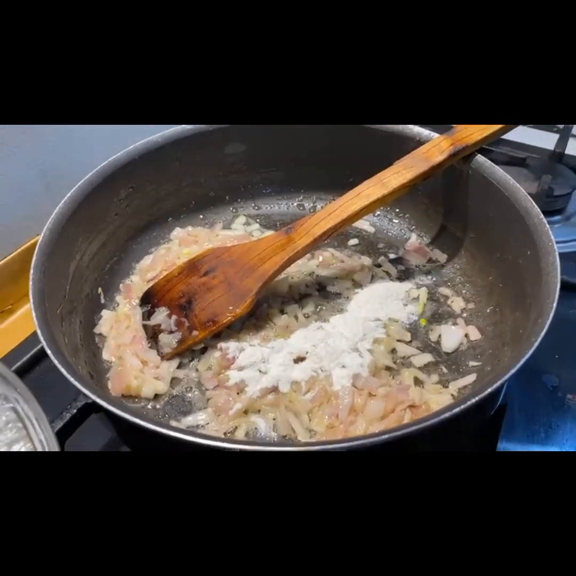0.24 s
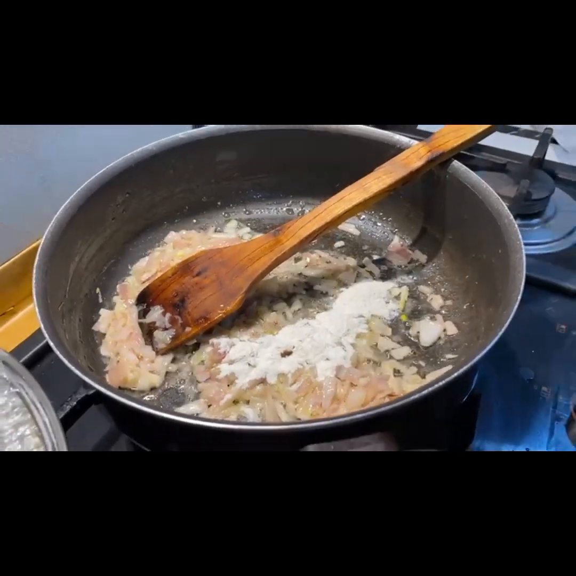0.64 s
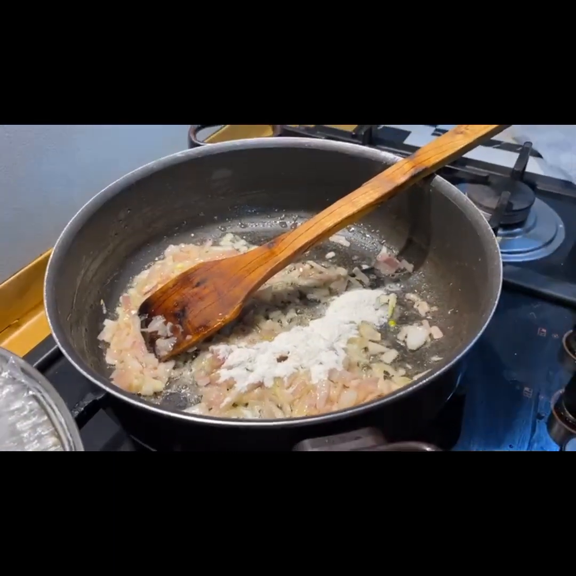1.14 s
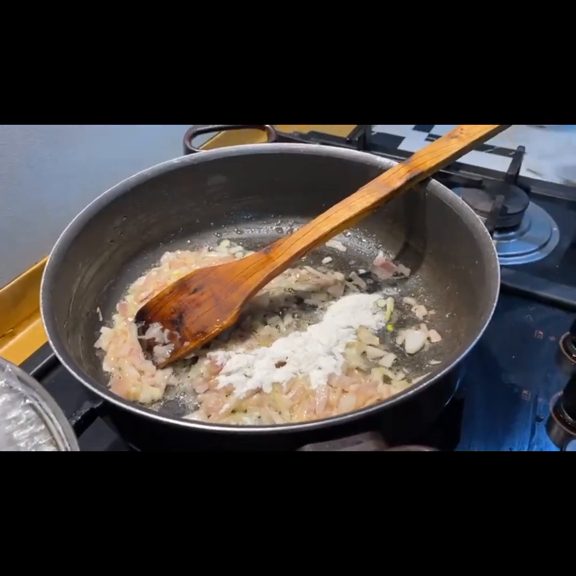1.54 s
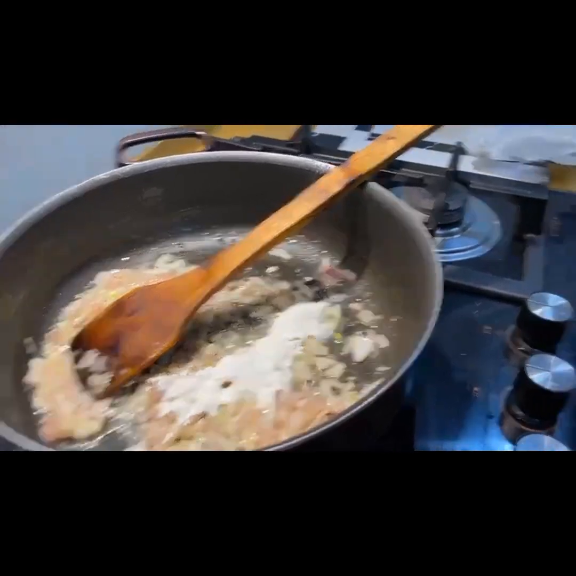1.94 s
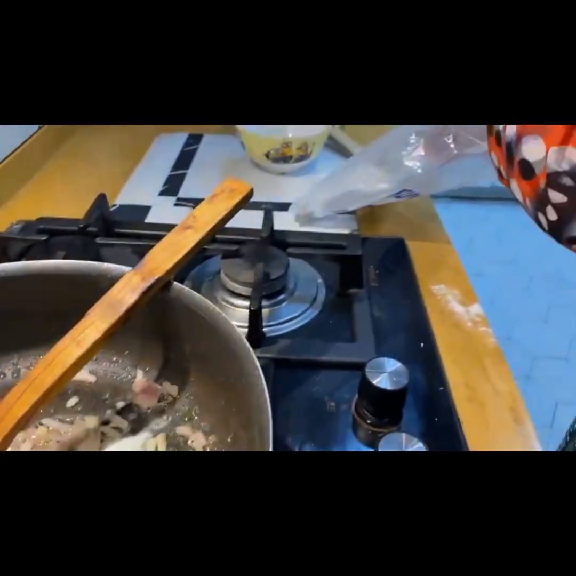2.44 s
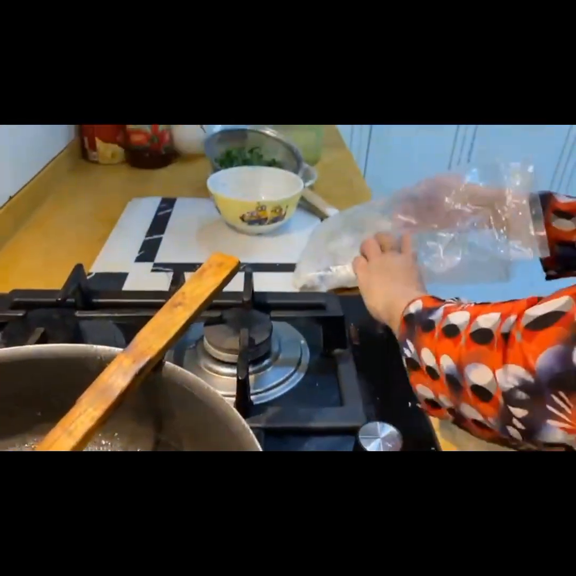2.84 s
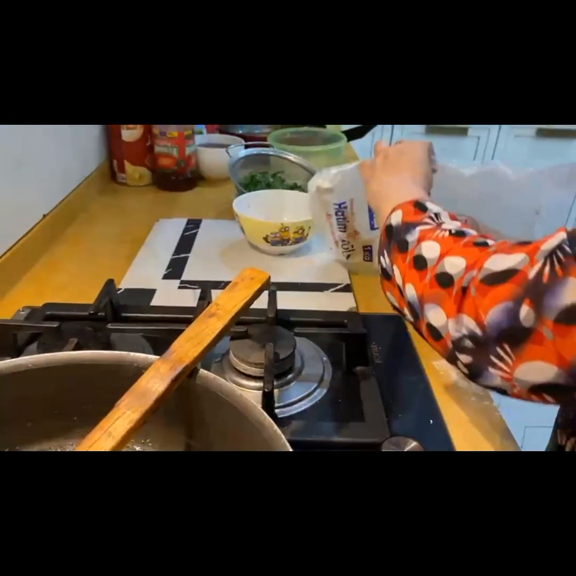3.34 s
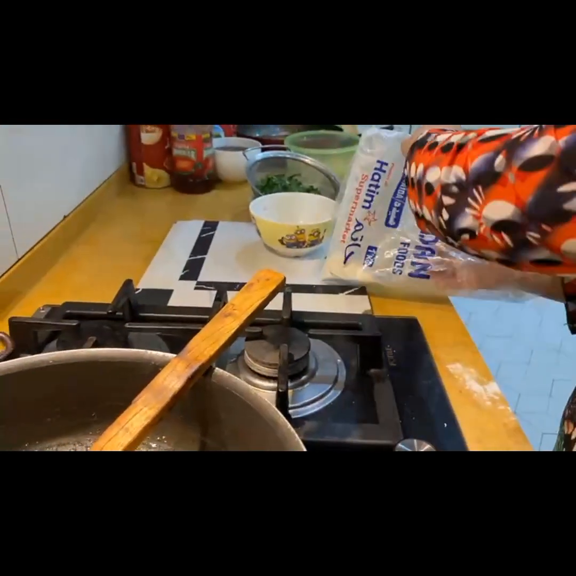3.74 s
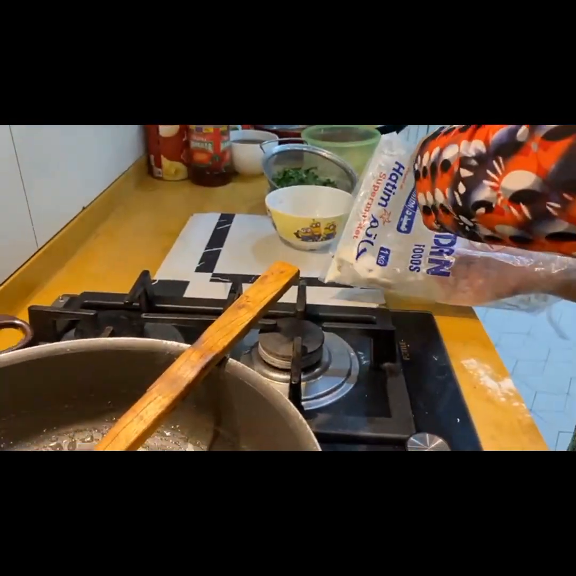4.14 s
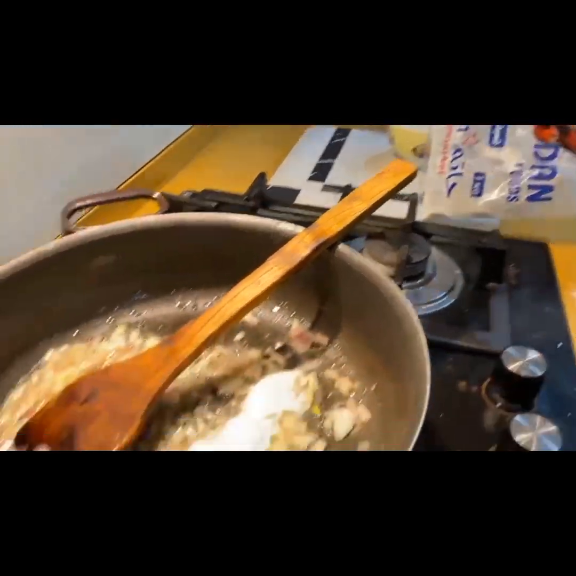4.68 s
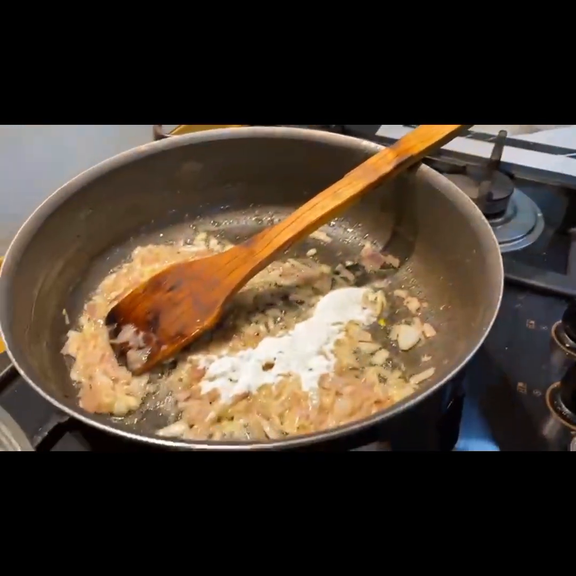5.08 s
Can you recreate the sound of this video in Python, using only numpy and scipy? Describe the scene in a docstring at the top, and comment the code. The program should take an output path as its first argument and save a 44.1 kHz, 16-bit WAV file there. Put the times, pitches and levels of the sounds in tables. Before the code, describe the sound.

A steady frying hiss and dense bubble crackle fill a small home kitchen over a faint fan rumble. Two soft low thumps come in the first half second, with a few small plastic ticks. After a calmer stretch, one very sharp spit pops, then a plastic bag crumples and snaps in clusters until the end, as more fat spits gather. Handheld stereo pickup near the pan, short room echo.

```python
"""Steam hisses and small bubbles burst as chopped onions fry in a pan; loud single spits stand out.
The sizzle is shaped noise plus random clicks; each spit is a ringing crack with a spray of droplets.
A plastic bag rustles on the worktop: random creases of film, and snaps that ring its modes.
A fan gives a low boom, faint tones and a soft wash of noise; two soft low thumps come early.
A hand-held pair of microphone ports picks it all up."""
import sys
import numpy as np
from scipy import signal
from scipy.fft import rfft, irfft
from scipy.io import wavfile
from scipy.ndimage import uniform_filter1d

SR = 44100
rng = np.random.default_rng(int(sys.argv[2]) if len(sys.argv) > 2 else 0)


def boost(x):
    """Linear amplitude factor 10**(x/20) for a level x in decibels (scalar or array-like)."""
    u = np.asarray(x, float) / 20
    return 10 ** u


def transcribe(u):
    """Save the signal u as a 16-bit wav file named by the first command-line argument.

    u: samples, shape (n,) or (channels, n), limited to [-1, 1]; the rate is SR.
    q: integer samples, one column per channel.
    """
    v = np.clip(np.atleast_2d(u).T, -1, 1)
    q = np.round(v * 32767).astype(np.int16)
    wavfile.write(sys.argv[1], SR, q)


N = 234303  # samples in the scene

# Resonant modes of the bag. Each row: frequency in Hz, relative level in dB, sharpness Q.
BAG_MODES = [(270, 0, 4), (540, 0, 6), (732, 0, 7), (957, 0, 8), (1410, 1, 12), (1817, 2, 17),
             (2320, 3, 22), (2850, 3, 24), (3370, 3, 26), (3800, 2, 14)]


def evened(x):
    """Normalization: scales a signal to an rms of 1."""
    return x / np.sqrt(np.mean(x ** 2) + 1e-20)


def read(points, hz):
    """Spectral interpolation: reads a (Hz, value) table on a log-frequency axis."""
    f, value = np.transpose(points)
    return np.interp(np.log(hz + 1), np.log(f + 1), value)


def follow(rows):
    """Amplitude envelope: turns (s, dB) rows into a gain for every sample."""
    s, db = np.transpose(rows)
    return boost(np.interp(np.arange(N) / SR, s, db))


def colour(x, points):
    """Linear filtering: multiplies the spectrum by a (Hz, dB) table."""
    return irfft(rfft(x) * boost(read(points, np.fft.rfftfreq(N, 1 / SR))), N)


def paired(x, y):
    """Channel coherence: left is x; right blends x with unrelated y by a likeness set per frequency."""
    # Left-right likeness as heard: diffuse lows, treble nearly all mid or, once turned, all side.
    # Each row: frequency in Hz, coherence from 0 to 1.
    likeness = [(60, .95), (150, .93), (300, .6), (500, .3), (950, .65), (1600, .2), (2800, .4),
                (3900, .86), (5200, .35), (6300, .96), (6900, .99), (7450, .995), (7950, .7), (8450, .999),
                (9700, .999), (10100, .6), (10700, .985), (11200, .999)]
    same = np.clip(read(likeness, np.fft.rfftfreq(N, 1 / SR)), 0, 1)
    right = same * rfft(x) + np.sqrt(1 - same ** 2) * rfft(y)
    return np.array([x, irfft(right, N)])


def patchy(points, patch_db, flicker_db):
    """Modulated noise: two noises with drifting spectral patches and a flicker shared by all bands."""
    frames, hz = N // 128 + 5, np.fft.rfftfreq(512, 1 / SR)
    a, b, c, d, patches = rng.standard_normal((frames, 257, 5)).T
    patches = uniform_filter1d(patches, size=8, axis=0)  # smooth over frequency
    patches = evened(uniform_filter1d(patches, size=20, axis=1))  # smooth over time
    flicker = evened(uniform_filter1d(rng.standard_normal(frames), size=12))
    band_db = read(points, hz)[:, None] + patch_db * patches + flicker_db * flicker
    spectra = np.array([a + 1j * b, c + 1j * d]) * boost(band_db)
    return evened(signal.istft(spectra, nperseg=512, noverlap=384)[1][:, :N])


def clicks(per_s, spread_db):
    """Poisson-like impulses: two unrelated random click trains; a few clicks are large."""
    height = boost(spread_db * np.minimum(rng.exponential(1, (2, N)), 5))
    sign = np.sign(rng.standard_normal((2, N)))
    return height * sign * (rng.random((2, N)) < per_s / SR)


def fuzzy(hz, width):
    """Narrow-band noise: a randomly driven resonance heard as a wavering tone of rms 1."""
    r = np.exp(-np.pi * width / SR)
    drive = rng.standard_normal((2, N)) + 1j * rng.standard_normal((2, N))
    slow = signal.lfilter([1 - r], [1, -r], drive)
    carrier = np.exp(2j * np.pi * hz * np.arange(N) / SR)
    return evened((slow * carrier).real)


def resonance(x, hz, q):
    """Second-order resonator: two poles of sharpness q, its response scaled to peak 1."""
    y = signal.lfilter(*signal.iirpeak(min(hz, 15000), max(q, .2), SR), x)
    return y / abs(y).max()


def kitchen(x, t60, wet_db):
    """Reverberation: hard walls return a short tail of sparse taps, paired like the steady sounds."""
    t = np.arange(SR // 3) / SR
    sign = rng.choice([-1., 1.], (2, len(t)))
    taps = sign * (rng.random((2, len(t))) < .1) * (t > .002)
    tail = taps * boost(-60 * t / max(t60, .01))
    tail = tail / np.linalg.norm(tail[0])
    wet = signal.oaconvolve(x[None], tail, axes=1)[:, :N]
    return x + boost(wet_db) * paired(*wet)


def fan():
    """Room resonance and turbulence: low modes boom, faint tones waver, air noise washes over all."""
    # Low room modes. Each row: frequency in Hz, bandwidth in Hz, relative level in dB.
    room_modes = [(71.6, 2.4, -17), (99.2, 12, 5), (124, 7.2, -3.5), (141.1, 3.5, -3)]
    # Faint tones. Each row: frequency in Hz, bandwidth in Hz, rms level in dB.
    tones = [(258, 25.4, -57), (397, 6.1, -62), (603, 2.3, -61), (1009, 16, -61)]
    # Relative spectrum of the air noise. Each row: frequency in Hz, density in dB per Hz.
    air = [(16, -38), (28, -12), (108, -5.5), (133, -27), (193, -46), (258, -4), (399, -12), (443, -27),
           (605, -13.5), (671, -20), (1040, -6.5), (1250, -27), (4000, -18.5), (5200, -16), (8800, -120)]
    rumble_db, waver_db, wash_db = -46, 0.5, -50  # rms levels; waver is the rms swing of the rumble
    boom = evened(sum(boost(db) * fuzzy(hz, width) for hz, width, db in room_modes))
    waver = evened(uniform_filter1d(rng.standard_normal(N), size=5000))
    rumble = boost(rumble_db + waver_db * waver) * boom
    whine = sum(boost(db) * fuzzy(hz, width) for hz, width, db in tones)
    wash = boost(wash_db) * patchy(air, patch_db=2.0, flicker_db=1.35)
    return paired(*(rumble + whine + wash))


def thumps():
    """Gaussian tone bursts: brief low swells, fed equally to both ports."""
    # Each row: centre in seconds, peak level in dB, frequency in Hz.
    swells = [(0.293, -35.5, 131), (0.46, -33, 125)]
    half_width_s = 0.026  # from the centre to 1/e of the peak
    t = np.arange(N) / SR
    total = np.zeros(N)
    for (s, db, hz), turn in zip(swells, rng.random(len(swells))):
        swell = np.exp(-((t - s) / half_width_s) ** 2)
        total += boost(db) * swell * np.sin(2 * np.pi * (hz * t + turn))
    return total


def film_creases():
    """Clustered impulses: dense creases of plastic film, coloured by its spectrum."""
    # Spectrum of the film. Each row: frequency in Hz, relative density in dB per Hz.
    film = [(120, -49), (250, -5.5), (500, 0.5), (800, 0.5), (1200, -4), (2000, -5.5), (3500, -9),
            (6000, -7), (12000, -65)]
    clump = boost(1.6 * evened(uniform_filter1d(rng.standard_normal(N), size=250)))
    return evened(colour(clicks(per_s=3300, spread_db=2.0) * clump, film))


def crinkles():
    """Modal excitation: small random creases, each ringing one of the upper modes of the bag."""
    first_mode = 3
    train = clicks(per_s=250, spread_db=3.5)[0]
    chosen = rng.integers(first_mode, len(BAG_MODES), N)
    rings = sum(resonance(train * (chosen == k), hz, q)
                for k, (hz, _, q) in enumerate(BAG_MODES) if k >= first_mode)
    return boost(-11) * evened(rings)


def bag_ring(slips, centre_hz):
    """Modal superposition: slips excite the bag's modes, less the further they lie from the centre."""
    reach_db_per_octave, rise_q = 34, 2.2  # fall-off from the centre; the blunt resonance rounds the onset
    nearest_hz = min((m[0] for m in BAG_MODES), key=lambda f: abs(f - centre_hz))
    shift = centre_hz / nearest_hz  # the grip shifts the modes
    ring = 0
    for k, (hz, db, q) in enumerate(BAG_MODES):
        gain = boost(db - reach_db_per_octave * abs(np.log2(hz / centre_hz))) * (-1) ** k
        mode = resonance(slips, shift * hz, q)
        ring = ring + gain * resonance(mode, shift * hz, q=rise_q)
    return ring / abs(ring).max()


def bag_snaps():
    """Buckling: single creases snap, giving a broad crack and a ringing of the bag."""
    # Each row: start in seconds, ring peak in dB, centre of the ringing in Hz,
    # decay time t60 of the slips in seconds, crack peak in dB.
    snap_rows = [(0.1215, -34, 2400, 0.014, -52), (0.246, -32, 964, 0.026, -46),
                 (1.104, -33.5, 2930, 0.015, -50), (1.218, -32, 4250, 0.006, -29),
                 (1.228, -37, 2600, .012, -50), (1.2735, -44, 2420, .01, -35),
                 (1.457, -37, 2200, .015, -42), (1.461, -42, 800, .02, -50), (1.652, -39, 790, .03, -42),
                 (1.792, -33.5, 1750, 0.1, -36), (1.892, -35.5, 990, 0.14, -55),
                 (2.511, -35, 1340, 0.039, -44), (2.582, -37, 796, 0.067, -31),
                 (2.837, -34.5, 800, 0.056, -41), (2.839, -39, 1570, .015, -50),
                 (2.853, -36, 755, 0.029, -50), (2.877, -35, 594, 0.049, -52),
                 (2.901, -33, 590, 0.013, -50), (2.907, -36, 786, 0.015, -28),
                 (2.928, -32, 770, 0.035, -45), (2.934, -27, 1780, .012, -41),
                 (2.942, -29.5, 1210, 0.023, -27), (2.947, -38, 270, 0.032, -45),
                 (2.954, -31, 1940, 0.016, -35), (2.9605, -27, 675, 0.014, -38),
                 (2.975, -39, 930, 0.015, -47), (2.9935, -25.5, 1385, 0.027, -24),
                 (2.997, -35, 740, 0.02, -44), (3.0183, -26.5, 1490, 0.01, -43),
                 (3.026, -32.5, 1120, 0.038, -47), (3.0625, -34, 1000, 0.015, -38),
                 (3.066, -26.5, 980, 0.016, -38), (3.0735, -29, 740, 0.012, -31),
                 (3.08, -40, 720, .02, -45), (3.2245, -27.5, 3350, 0.034, -31),
                 (3.225, -34, 2330, .012, -50), (3.2268, -31, 3330, .015, -32),
                 (3.231, -41, 2350, .015, -33), (3.2425, -24, 2420, 0.03, -34),
                 (3.248, -34.5, 450, 0.03, -35), (3.277, -39, 2310, .012, -42),
                 (3.304, -39, 790, 0.038, -44), (3.317, -35, 1950, 0.028, -35),
                 (3.33, -39.5, 934, 0.041, -44), (3.5145, -31, 1090, 0.02, -23),
                 (3.5215, -33, 756, 0.024, -25), (3.526, -31, 680, 0.022, -27),
                 (3.5325, -30, 720, 0.025, -28), (3.687, -33.5, 1240, 0.094, -32),
                 (3.82, -37, 1510, .02, -40), (3.851, -35, 1050, 0.018, -50), (3.92, -38, 750, .02, -50),
                 (3.9335, -34, 2760, 0.0089, -36), (3.959, -30.5, 1550, 0.02, -29),
                 (3.9745, -29.5, 2180, 0.015, -40), (3.9745, -34, 810, 0.013, -50),
                 (4.0103, -34, 1490, .01, -30), (4.0283, -24, 1785, 0.018, -22),
                 (4.028, -31.5, 920, 0.019, -45), (4.033, -33, 3320, 0.044, -27),
                 (4.355, -39, 740, 0.043, -48), (4.3783, -33, 910, .012, -50),
                 (4.3788, -33, 2000, .02, -48), (4.3785, -22.5, 1475, 0.017, -21.5),
                 (4.379, -27.5, 2850, .015, -43), (4.459, -37, 1040, 0.073, -31),
                 (4.717, -31.5, 1270, 0.04, -50), (4.727, -30, 1880, 0.026, -45),
                 (4.728, -37, 4270, .015, -45), (5.101, -34, 2510, 0.025, -25.5),
                 (5.1035, -33, 1750, .012, -43), (5.1115, -31.5, 1340, 0.029, -49)]
    buckle_db = 25  # over the rms of the undecayed slips
    out, t = np.zeros(N + 3000), np.arange(3000) / SR
    grits = rng.standard_normal((len(snap_rows), 3000))
    for (s, ring_db, centre_hz, t60, crack_db), grit in zip(snap_rows, grits):
        # one buckle, then ever smaller slips
        slips = boost(buckle_db) * (t == 0) + evened(grit ** 3) * boost(-60 * t / max(t60, .005))
        ring = bag_ring(slips, centre_hz)
        crack = resonance(resonance(slips, 3300, q=0.85), 2400, q=0.64)
        out[round(s * SR):][:3000] += boost(ring_db) * ring + boost(crack_db) * crack
    return out[:N]


def bag():
    """Superposition: paired creases of film, plus snaps and crinkles that echo in the kitchen."""
    # How busily the bag is handled. Each row: time in seconds, rustle gain in dB.
    rustle = [(0, -47.5), (.9, -51.5), (1.75, -48.5), (2.1, -51), (2.8, -48.5), (2.98, -40), (3.1, -43.5),
              (3.33, -42), (3.41, -48.5), (3.75, -46.5), (4.05, -47), (4.3, -49.5), (4.39, -42.5),
              (4.48, -48.5), (4.72, -46.5), (5.0, -50), (5.31, -46.5)]
    handling = follow(rustle)
    creases = handling * paired(*film_creases())
    return creases + kitchen(bag_snaps() + handling * crinkles(), t60=0.13, wet_db=-7)


def sizzle():
    """Turbulence and shot noise: steam hiss and a dense crackle of bursting bubbles, ruled by the heat."""
    # Heat and nearness of the pan. Each row: time in seconds, gain in dB.
    heat = [(0.0, -45.5), (0.97, -48), (1.83, -47), (2.35, -47), (2.96, -48), (3.09, -47), (3.59, -47.5),
            (4.76, -46), (4.91, -46), (5.31, -46.5)]
    # Spectrum of hiss and crackle. Each row: frequency in Hz, relative density in dB per Hz.
    fizz = [(900, -8), (2000, -1.5), (3500, -4.5), (5500, -2.5), (7000, 2.5), (7800, 0.5), (8300, 2.5),
            (9000, -4.5), (9900, -5), (11000, -4), (12500, -3)]
    hiss = patchy(fizz, patch_db=2.0, flicker_db=0.77)
    t = np.arange(200) / SR
    puff = rng.standard_normal(200) * boost(-60 * t / 0.00087)  # each burst rings briefly in the pan
    bursts = signal.oaconvolve(clicks(per_s=400, spread_db=4), puff[None], axes=1)[:, :N]
    crackle = evened(colour(bursts, fizz))
    return follow(heat) * paired(*(boost(2.5) * hiss + boost(-8.5) * crackle))


def spits():
    """Impulse response: a tearing bubble rings at its pitch, then sprays droplets of fat."""
    # Each row: start in seconds, peak of the direct sound in dB, bubble pitch in Hz,
    # decay time t60 of the spray in seconds.
    spit_rows = [(0.427, -26, 7100, 0.013), (0.691, -23, 9000, .01), (0.8879, -28.5, 5700, 0.0074),
                 (1.0515, -32, 7500, .005), (1.0765, -26, 6930, .008), (1.1037, -20.5, 7300, .018),
                 (1.342, -39, 6800, .006), (1.436, -31, 6500, .01), (1.599, -27, 5800, 0.0067),
                 (2.537, -11.5, 10800, 0.0037), (2.692, -22.5, 6800, 0.01), (2.9937, -27, 4550, 0.026),
                 (3.073, -22, 7160, 0.0058), (3.1272, -23, 6190, 0.0071), (3.2246, -22.5, 6950, 0.016),
                 (3.5143, -21.5, 5500, 0.0065), (3.522, -23.5, 6250, 0.024), (3.669, -25, 6960, .008),
                 (3.671, -28, 6900, 0.0072), (3.934, -25.5, 6260, 0.011), (4.031, -27, 6800, 0.035),
                 (4.2144, -30, 5470, 0.0066), (4.277, -26.5, 5700, 0.017), (4.727, -25.5, 6700, .015),
                 (4.856, -27, 7410, .008), (4.919, -16.5, 7000, .006), (4.9567, -23, 6800, .006),
                 (4.972, -25, 7460, .006), (4.991, -31, 6290, 0.0067), (5.027, -29, 7230, .008),
                 (5.083, -29, 6500, .012), (5.1404, -28, 6000, 0.006), (5.226, -27, 6700, .008),
                 (5.287, -22, 6300, 0.0073)]
    aside = 0.1  # spits land left or right of the middle of the pan
    out, t = np.zeros((2, N + 1500)), np.arange(1500) / SR  # out holds middle and side
    sprays = rng.standard_normal((len(spit_rows), 1500))
    for (s, db, hz, t60), spray in zip(spit_rows, sprays):
        # the skin tears at once, droplets follow
        burst = (t == 0) + boost(-14.5 - 60 * t / max(t60, .002)) * spray
        crack = resonance(resonance(burst, hz, q=1.27), hz, q=1.27)
        out[:, round(s * SR):][:, :1500] += boost(db) * crack * [[1], [aside * np.sign(spray[0])]]
    middle, side = out[:, :N]
    return kitchen(middle, t60=0.12, wet_db=-4.5) + side * [[1], [-1]]


def scene():
    """Superposition: fan, thumps, bag and pan add linearly."""
    return fan() + thumps() + bag() + sizzle() + spits()


def band_limit(x):
    """A steep low-pass at the top of the band."""
    return signal.sosfilt(signal.butter(12, 12800, fs=SR, output="sos"), x)


def record(dry):
    """Linear filtering: the ports differ in level, the treble's stereo phase is stepped, both ends roll off."""
    # Microphone response. Each row: frequency in Hz, gain in dB.
    mic = [(20, -42), (45, 3), (80, -1.5), (11600, 2), (11950, -17), (12400, -30), (13000, -60)]
    # Level difference. Each row: frequency in Hz, left over right in dB.
    lean = [(60, 1.5), (120, 2.5), (350, -1), (640, 3), (1150, 1.5), (2700, 2.5), (3800, .5), (5200, 2.5),
            (6800, .3), (8300, 0)]
    # Stereo phase as heard, stepped in the treble. Each row: frequency in Hz, left's lead in half turns.
    stereo_phase = [(300, 0), (1300, .25), (2600, .25), (3600, .03), (7550, 0), (8420, -1), (9750, -1),
                    (10450, -2)]
    hz = np.fft.rfftfreq(N, 1 / SR)
    # half of each difference goes to either side
    left = boost(read(lean, hz) / 2) * np.exp(.5j * np.pi * read(stereo_phase, hz))
    ports = irfft(rfft(dry) * boost(read(mic, hz)) * np.array([left, 1 / left]), N)
    return band_limit(ports)


dry = scene()
out = record(dry)
transcribe(out)
```